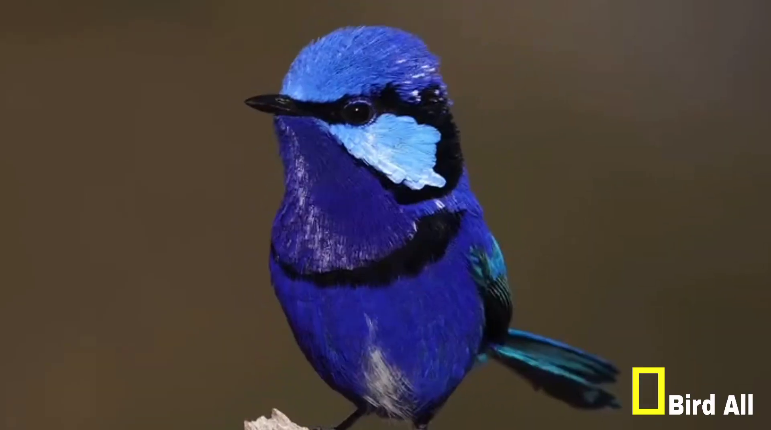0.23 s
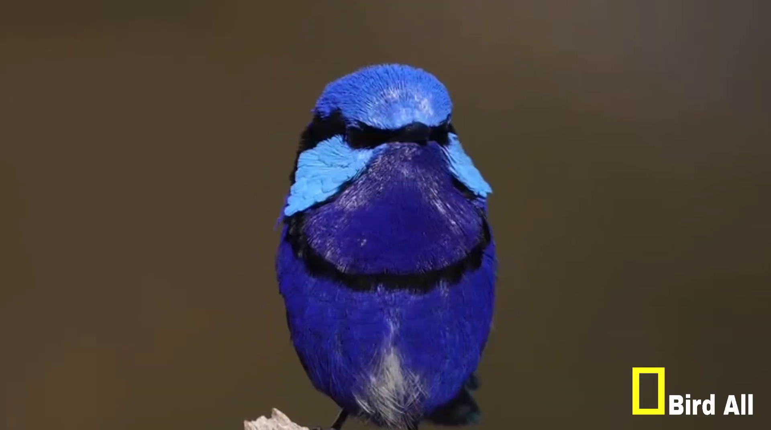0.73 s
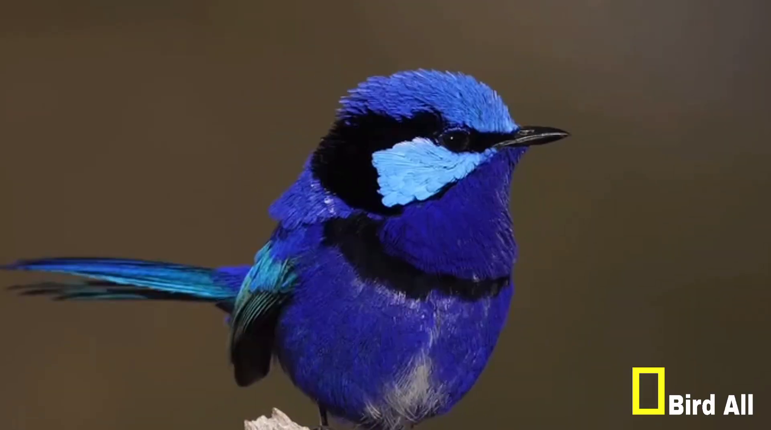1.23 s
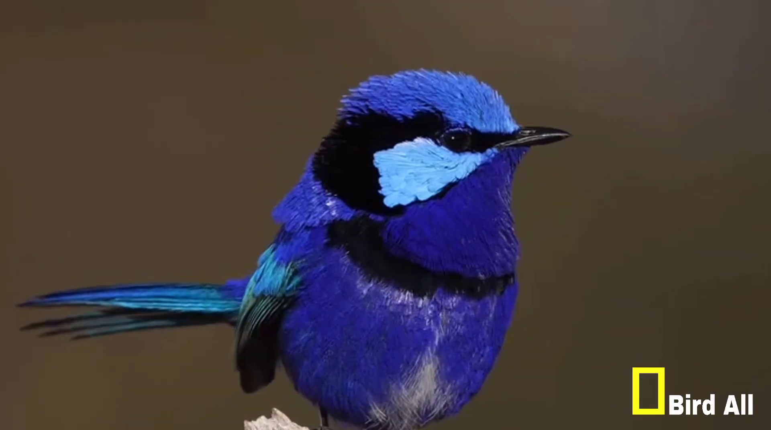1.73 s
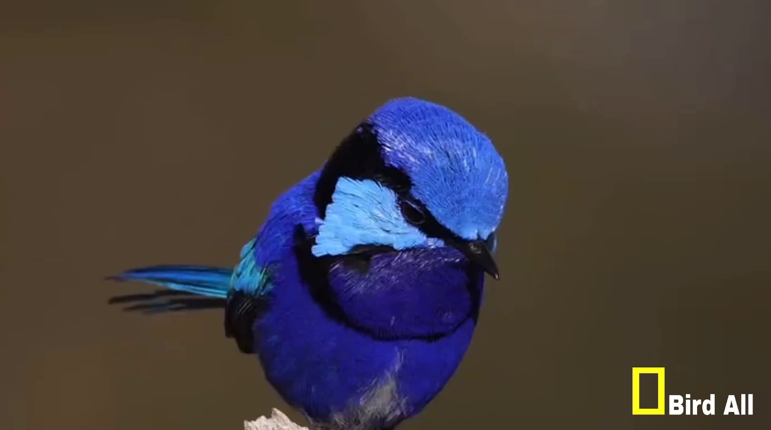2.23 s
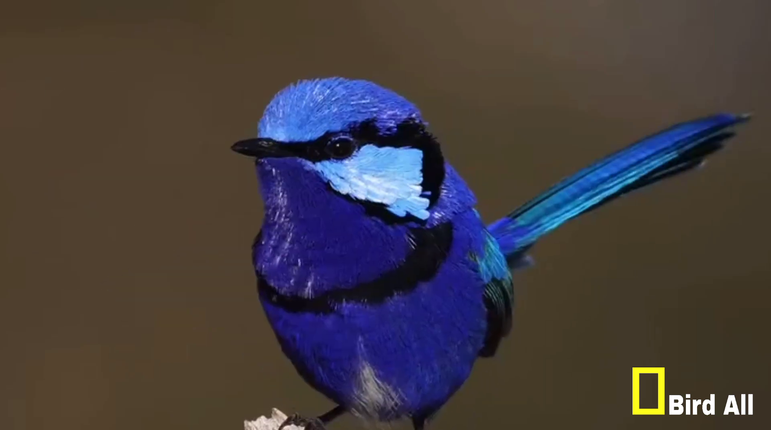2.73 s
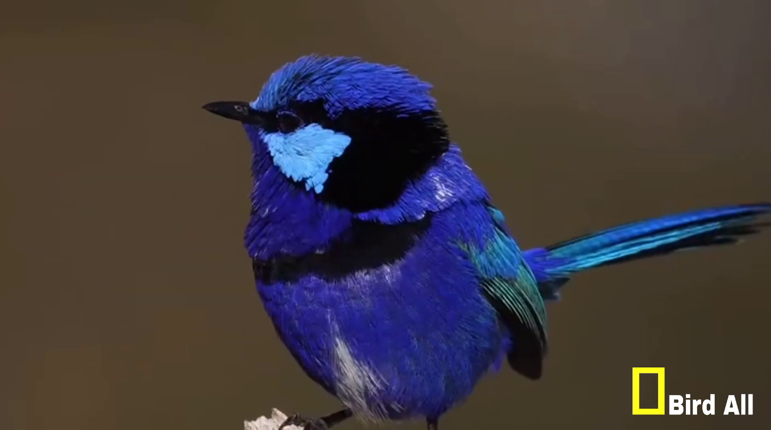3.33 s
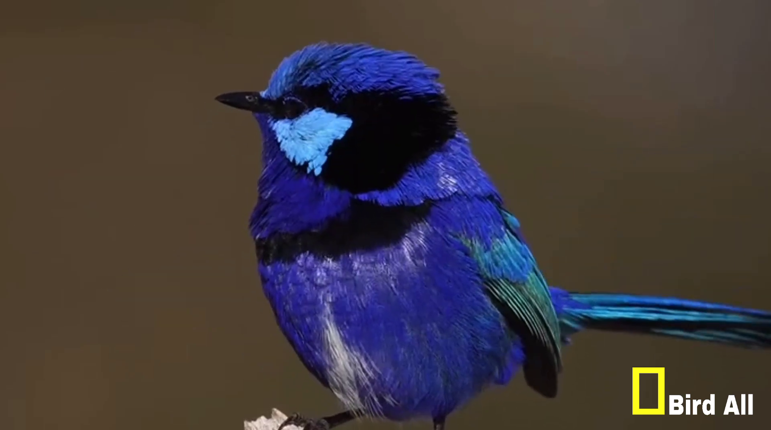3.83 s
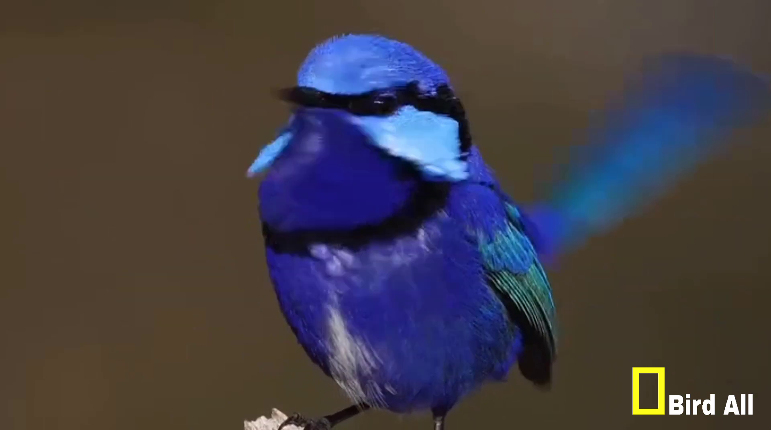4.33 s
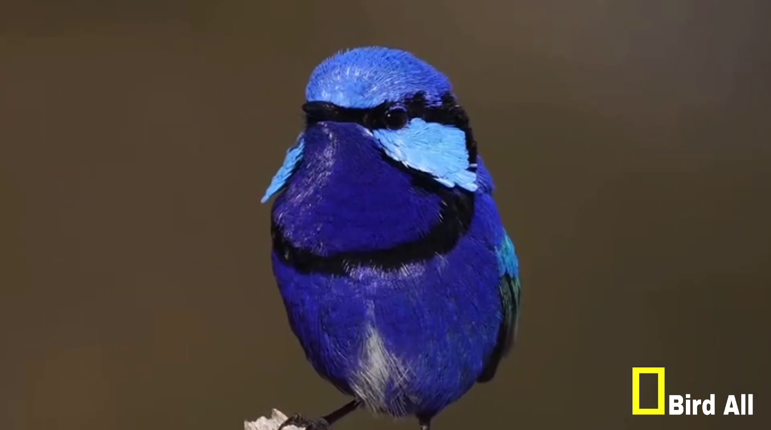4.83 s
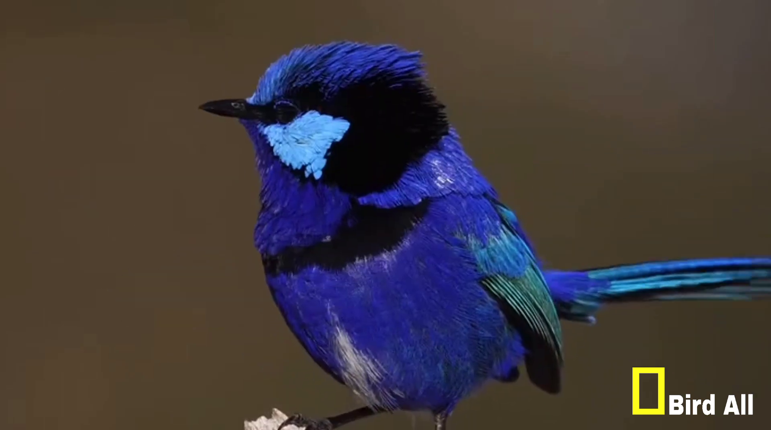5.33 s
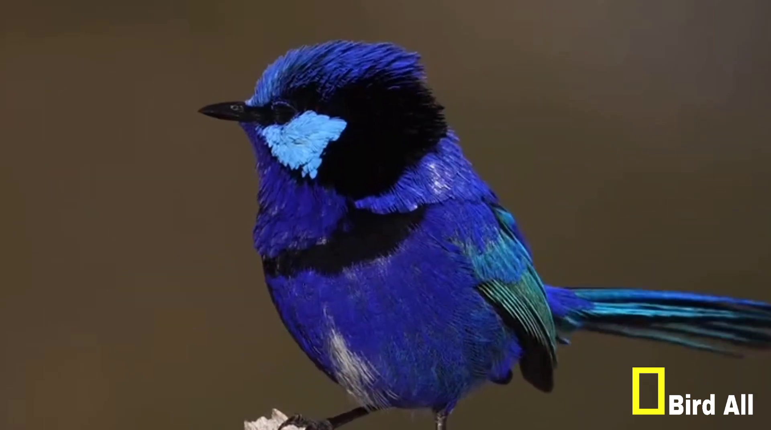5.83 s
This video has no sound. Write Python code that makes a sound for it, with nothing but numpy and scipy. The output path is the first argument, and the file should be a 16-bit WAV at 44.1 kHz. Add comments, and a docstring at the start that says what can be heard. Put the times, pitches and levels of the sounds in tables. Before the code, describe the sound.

In an echoing wood with a quiet, smooth leaf hiss, a small bird starts with a clear high whistle gliding down from 0.1 to 0.4 seconds, then slurs and a rapid, slightly rough warble of upward strokes until 1.3, broken by a steep plunge near 1.05. From 1.5 to 2.1 another bird to the right gives five quick, evenly spaced falling chirps. Thin held whistles drop away at 2.3 and 2.5 among low rising notes from a blurred neighbour. From 2.8 to 3.35 short rising flicks patter over low dips and ticks. A bright climb comes at 3.4, with faint distant buzzes around 3.3 and 3.8. Five sharper hooked falls repeat evenly from 4.0 to 4.8. Sparse slurs and high held whistles close the passage from 5.0 to 6.0. Fainter calls sit left; long diffuse echoes trail every note, and a faint sizzle swells near 2.6.

```python
"""In a wood, small songbirds answer each other: one ahead, leaning right, one farther right, others close by it.
Gliding sines make their whistles, slurs and runs of a repeated note; more whistle and buzz farther off, to the left.
The trees, as decaying noise, throw every note back in a long smear. Far leaves are a smooth, bass-light hiss,
with a faint narrow sizzle above. The direct song has opposite polarity left and right, as from a two-way microphone.
"""
import sys
import numpy as np
from scipy import signal
from scipy.fft import rfft, irfft, next_fast_len
from scipy.io import wavfile
from scipy.ndimage import uniform_filter1d, map_coordinates

SR = 44100
rng = np.random.default_rng(int(sys.argv[2]) if len(sys.argv) > 2 else 0)


def wav_out(sig):
    """Save sig, one row per channel (or a flat mono array), as 16-bit PCM at SR to the path in sys.argv[1]."""
    wavfile.write(sys.argv[1], SR, np.round(np.clip(np.atleast_2d(sig).T, -1, 1) * 32767).astype(np.int16))


N = 267863

# Note levels are those of the voice at the beak, before each bird's direct and echo gains.
# Slurs, one glide a row: start t/s, length t/s, first f/Hz, last f/Hz, bend (over 1 holds then moves,
# under 1 moves then holds), end level/dB, start over end level/dB
AHEAD_SLURS = [ (-0.12, 0.12, 4765, 4623, 0.99, -28.5, -10), (0.39, 0.066, 4707, 4525, 0.5, -31, 4),
               (0.49, 0.071, 4620, 4559, 1.36, -20.5, -11), (2.703, 0.069, 4720, 4490, 0.35, -37.5, -1.5),
               (3.635, 0.015, 6930, 7720, 0.41, -48, 8), (4.135, 0.0087, 6140, 6000, 1.1, -51, 1),
               (4.31, 0.017, 6080, 6200, 2.3, -49, -8.5), (4.485, 0.013, 5620, 5900, 1.2, -47, -3),
               (4.66, 0.014, 5540, 5740, 1.24, -49.5, -4.5), (5.085, 0.021, 5570, 5700, 0.63, -54, 8.5),
               (5.758, 0.047, 6540, 4910, 0.27, -52, -4), ]
# Slurs of the bird on the right: the same columns
RIGHT_SLURS = [ (0.72, 0.11, 7480, 6900, 0.9, -43, -14), (1.03, 0.043, 7780, 5550, 0.82, -42, -3.5),
               (1.43, 0.024, 4975, 3580, 1.37, -43, -3), (3.565, 0.035, 5220, 3570, 1, -43.5, 2.5),
               (3.715, 0.082, 5905, 6253, 0.27, -32.5, -7.5), (3.945, 0.027, 8380, 7320, 1.1, -45.5, -2.5),
               (5.19, 0.065, 4470, 3870, 0.47, -46.5, 3.5), (5.274, 0.021, 5100, 3620, 1, -39.5, -10.5), ]
# Faint slurs from deeper in the wood: the same columns
DISTANT_SLURS = [ (-0.1, 0.19, 6300, 6700, 0.77, -74.5, 7), (-0.04, 0.059, 2605, 2635, 1.2, -58.5, 6),
                 (-0.02, 0.066, 1478, 1400, 0.91, -71, 9.5), (0.01, 0.067, 2150, 2310, 0.65, -67, 0),
                 (0.1, 0.37, 2788, 2490, 0.71, -59.5, -2), (0.775, 0.034, 3224, 3567, 0.46, -46, -2),
                 (0.84, 0.023, 3340, 4320, 1.2, -42, -14.5), (0.92, 0.018, 3630, 3585, 0.8, -45, 1),
                 (0.955, 0.017, 3660, 3540, 1.7, -44.5, -0.5), (2.35, 0.039, 5270, 5660, 1.6, -49, -1.5),
                 (2.05, 0.04, 4310, 4345, 1.6, -54, 5.5), (3.175, 0.047, 4590, 4690, 3.4, -51, -5),
                 (3.482, 0.03, 5580, 5550, 0.97, -48, 3.5), (3.63, 0.047, 3120, 3110, 0.96, -51.5, -3),
                 (4.05, 0.03, 4500, 3714, .7, -44, 0), (4.135, 0.087, 3350, 3770, 1.35, -58.5, -2.5),
                 (2.225, .02, 5080, 5100, 1.1, -53, -3.5), (4.885, 0.087, 2720, 2685, 1.27, -63, -3),
                 (5.14, 0.056, 3630, 3520, 1.8, -63.5, 4), (5.43, 0.006, 5370, 4630, 0.91, -53.5, 2.5),
                 (5.44, 0.047, 4300, 3740, 0.39, -62, -5), (5.48, 0.015, 4700, 4520, 0.72, -57, -1), ]
# Buzzy slurs from deeper in the wood: the same columns, then widest pitch swing f/Hz
BUZZ_SLURS = [(3.344, 0.073, 3120, 3050, 1.3, -52, 5.5, 310), (3.8, 0.058, 4800, 4950, 1.5, -48, -7, 290),
              (3, .04, 2200, 2350, 0.85, -60, -0.5, 150), (3.84, .035, 2600, 2350, 0.91, -68, -1, 150),
              (3.81, 0.085, 2850, 3600, 1.4, -51, -3.5, 390), (3.885, 0.16, 4030, 3820, 1.23, -62, 12, 539)]
# Held notes that drop away: start t/s, length t/s, held f/Hz, last f/Hz, bend, end level/dB,
# start over end level/dB
HELD_NOTES = [(2.316, 0.14, 7140, 5894, 4.1, -37.5, 5), (2.515, 0.13, 7417, 6070, 3.1, -36, -4.5),
              (5.032, 0.099, 7790, 7200, 6.8, -42.5, 0), (5.495, 0.13, 7670, 6600, 2.54, -50, 3),
              (5.733, 0.087, 7790, 6360, 3.9, -40.5, -9.5), (5.894, 0.13, 7720, 6600, 3.2, -45, -6)]

# Long notes with a shape of their own, a fall and a plunge ahead: t/s, f/Hz, level/dB
LONG_FALL_SHAPE = [(0.105, 8560, -45), (0.125, 8500, -31.5), (0.15, 8480, -34), (0.2, 8370, -29.5),
                   (0.24, 8087, -30), (0.28, 7810, -27.5), (0.315, 7630, -32), (0.34, 7596, -31),
                   (0.365, 7400, -42)]
PLUNGE_SHAPE = [(1.045, 4400, -38), (1.054, 4370, -22.5), (1.07, 4330, -22), (1.086, 4260, -28),
                (1.098, 3900, -25.5), (1.11, 3770, -26.5), (1.12, 3530, -33), (1.128, 3050, -44.5)]
# The warble ahead, a list a note; most stroke upward, others arch or fall: t/s, f/Hz, level/dB
WARBLE_NOTES = [
    [(0.6, 4566, -27.5), (0.632, 4706, -23.5), (0.643, 4910, -25.5), (0.65, 5150, -30.5)],
    [(0.702, 4680, -27.5), (0.72, 4470, -26), (0.732, 4600, -24), (0.74, 5000, -23.5), (0.746, 5580, -25.5)],
    [(0.795, 4620, -31.5), (0.815, 4520, -25.5), (0.83, 4620, -22.5), (0.838, 5140, -24.5),
     (0.85, 5290, -29)],
    [(0.885, 5100, -39.5), (0.905, 5605, -36.5), (0.918, 6050, -34.5), (0.935, 6150, -32.5),
     (0.965, 6120, -36), (0.985, 5860, -34), (1.0, 5510, -37.5)],
    [(1.178, 4500, -33.5), (1.195, 4800, -28.5), (1.204, 5150, -27), (1.213, 6000, -32.5)],
    [(1.228, 5050, -37.5), (1.256, 4620, -36.5), (1.263, 4090, -44.5), (1.272, 3853, -36),
     (1.29, 3730, -46.5)],
]
# A climb, a wave and a short arch on the right: t/s, f/Hz, level/dB
CLIMB_SHAPE = [(3.372, 5980, -46.5), (3.385, 6590, -30), (3.41, 7016, -29.5), (3.45, 7250, -40.5),
               (3.49, 7440, -42), (3.515, 7450, -48)]
WAVE_SHAPE = [(5.347, 6530, -47.5), (5.357, 6760, -35), (5.373, 5720, -38), (5.39, 5480, -39.5),
              (5.422, 5970, -39), (5.453, 5904, -52.5)]
HOOK_SHAPE = [(1.366, 6700, -56), (1.375, 7240, -52), (1.4, 6480, -47.5)]
# A far fall that lands and holds: t/s, f/Hz, level/dB
DROP_SHAPE = [(3.508, 4700, -52.5), (3.522, 4000, -39.5), (3.535, 3450, -41), (3.555, 3084, -43),
              (3.578, 3060, -50)]

# A quick falling note, by keyword: length t/s, first and last f/Hz, bend, entry level/dB over the end,
# easing (over 1 slows the glide before its end), mid-note swell level/dB
QUICK_FALL_NOTE = dict(length=.075, first_hz=7930, last_hz=3705, bend=1.6, entry_db=-6, easing=1.7, swell_db=7.5)
# Its run: start t/s, level/dB
QUICK_FALL_RUN = [(1.513, -48), (1.648, -47), (1.781, -45.5), (1.913, -46.5), (2.047, -45.5)]
# A fall that first hooks up to its top: t/s after the start, f/Hz, level/dB over the run's
HOOKED_FALL_SHAPE = [(-0.01, 7800, -20.5), (0.012, 8230, -5.5), (0.035, 7500, -6.5), (0.047, 6850, 1),
                     (0.058, 5720, 4.5), (0.07, 4830, -2.5), (0.082, 4287, 4), (0.088, 4120, -2.5)]
# Its run: start t/s, level/dB
HOOKED_FALL_RUN = [(4.021, -41), (4.198, -41.5), (4.373, -42), (4.546, -43), (4.722, -43)]
# A short rising flick, by keyword: length t/s, first and last f/Hz, bend, entry and swell level/dB
FLICK_NOTE = dict(length=.038, first_hz=3640, last_hz=4060, bend=1.4, entry_db=-11, swell_db=1)
# Its run: start t/s, level/dB
FLICK_RUN = [(2.836, -36), (2.931, -35), (3.024, -33), (3.115, -35), (3.207, -33.5), (3.295, -34.5)]
# A low dipping note, by keyword: length t/s, first and last f/Hz, bend, entry level/dB, easing
LOW_DIP_NOTE = dict(length=0.032, first_hz=2820, last_hz=2668, bend=1, entry_db=3.5, easing=2.35)
# Its run: start t/s, level/dB
LOW_DIP_RUN = [(2.204, -53.5), (2.919, -50), (2.978, -52), (3.044, -50), (3.107, -49), (3.171, -45.5),
               (3.239, -54), (3.322, -53.5)]
# A faint fall, then a low hold that swings upward: t/s after the start, f/Hz, level/dB over the run's
PICKUP_SHAPE = [(-.036, 5700, -13.5), (-.026, 5160, -9.5), (-.016, 4700, -15)]
RISE_SHAPE = [(0, 3037, -8), (.02, 3082, -1.5), (.032, 3387, -2.5), (.046, 3873, 5), (.054, 4350, -4.5),
              (.062, 5070, -4)]
# Their run: start t/s, level/dB
RISE_RUN = [(2.192, -44.5), (2.392, -42.5), (2.586, -40), (2.787, -39.5)]
# Short falling ticks: start t/s, first f/Hz, level/dB
TICK_NOTES = [(2.892, 5110, -55), (3.058, 5300, -58), (3.15, 5200, -57), (3.291, 4900, -56.5),
              (3.358, 5090, -56.5)]

# Faint partials beside the whistle: multiple of the pitch, level/dB
AHEAD_PARTIALS = [(1.5, -43), (2, -46), (3, -42)]
RIGHT_PARTIALS = [(1.5, -46)]
# The late smear from the depth of the wood: f/Hz, decay by 60 dB t/s
WOOD_DECAY = [(2500, 3), (4500, 2.13), (8000, 2.36)]
# Spectrum of the leaf hiss, relative: f/Hz, level/dB per Hz
LEAF_SPECTRUM = [(200, -35), (400, -23), (600, -15), (800, -5), (1000, -1), (1500, 0), (2200, 0),
                 (5000, .5), (9000, -2), (11500, -3), (13000, -5), (14300, -7.5), (15300, -11)]
# Left-right likeness of the hiss: f/Hz, correlation from -1 to 1
LEAF_LIKENESS = [(250, -.3), (600, .3), (1200, .15), (2500, -.1), (8000, -.3), (14000, -.4)]
# Swell of the high sizzle: t/s, level/dB
SIZZLE_SWELL = [(0, -88), (2.2, -79.5), (2.4, -69.5), (2.65, -61.5), (2.9, -82.5), (3.5, -79.5),
                (3.998, -77), (4.5, -84), (6.1, -76.5)]

FADE = 0.005  # half the swell at each end of a note (s)
LEAD = SR // 4  # room for notes that begin before zero (samples)
ENTRY_SETTLES = 0.87  # how soon the level leaves its start (1 = evenly)
LEAD_IN_HZ, LEAD_IN_S, LEAD_IN_DB = 700, 0.0048, -8  # a held note enters softly from above,
DIP_HZ, DIP_S = 458, 0.0194  # overshoots below the held pitch and climbs back
TICK_S, TICK_FALL_HZ = 0.012, 296
BUZZ_RATE_HZ, BUZZ_SWELL_DB = 90, 7  # a buzz swells and shakes most widely in its middle
BUZZ_NARROW = 0.51  # its swing at both ends over the widest
RASP_RATE, FLUTTER_RATE = 220, 62.5  # random curves of pitch and level (knots a second)
CLUMP_DB, CLUMP_RATE = 2.5, 45  # uneven echo path: depth, knots a second of delay
TWIG_T60 = 0.055  # twigs round the perch smear the direct sound (s)
STIR_DB, STIR_RATE = 1.13, 45  # moving leaves make the echoes swell and sink: depth, knots a second
SIZZLE_HZ, SIZZLE_WIDE_HZ = 10800, 1100
TOP_HZ = 15500


def singer_ahead():
    """Clear whistles, then a plunge and a rougher warble whose notes are more blurred by twigs."""
    place = dict(pan_db=-10.0, echo_pan_db=-0.1, direct_db=-1.5,
                 near_db=2.5, far_db=-7.0, near_t60=0.42, alike=0.35)
    clear = bird(slurs(AHEAD_SLURS) + [LONG_FALL_SHAPE], AHEAD_PARTIALS,
                 flutter_db=1.5, rasp=0.0023, blur=0.16, **place)
    plunge = bird([PLUNGE_SHAPE], AHEAD_PARTIALS, flutter_db=2.0, rasp=0.004, blur=0.25, **place)
    warble = bird(WARBLE_NOTES, AHEAD_PARTIALS, flutter_db=4.0, rasp=0.011, blur=0.75, **place)
    return clear + plunge + warble


def singer_right():
    """Slurs, shaped and held notes and runs of falls, voiced as nearly pure sines."""
    shaped = [CLIMB_SHAPE, WAVE_SHAPE, HOOK_SHAPE]
    holds = [held(*row) for row in HELD_NOTES]
    quick = run_of(QUICK_FALL_NOTE, QUICK_FALL_RUN)
    hooked = [np.add(HOOKED_FALL_SHAPE, [s, 0, db]) for s, db in HOOKED_FALL_RUN]
    return bird(slurs(RIGHT_SLURS) + shaped + holds + quick + hooked, RIGHT_PARTIALS,
                flutter_db=3.0, rasp=0.0015, blur=0.08,
                pan_db=-17.0, echo_pan_db=0.0, direct_db=-2.0,
                near_db=1.5, far_db=-7.0, near_t60=0.3, alike=0.28)


def neighbour():
    """A bird among twigs: rises with a faint pickup, and ticks, much smeared by short extra paths."""
    rises = [np.add(part, [s, 0, db]) for s, db in RISE_RUN for part in (PICKUP_SHAPE, RISE_SHAPE)]
    ticks = [glide(s, TICK_S, hz, hz - TICK_FALL_HZ, 1.0, db, 0) for s, hz, db in TICK_NOTES]
    return bird(rises + ticks, [], flutter_db=2.9, rasp=0.013, blur=0.8,
                pan_db=-6.5, echo_pan_db=-0.5, direct_db=-3.0,
                near_db=1.5, far_db=-1, near_t60=0.34, alike=0.041)


def flicks_and_dips():
    """Flicks and low dips, overlapping at different paces, with weaker near echoes."""
    return bird(run_of(FLICK_NOTE, FLICK_RUN) + run_of(LOW_DIP_NOTE, LOW_DIP_RUN), [],
                flutter_db=1.5, rasp=0.0027, blur=0.2,
                pan_db=-13, echo_pan_db=-1.5, direct_db=-1.0,
                near_db=0.0, far_db=-3.0, near_t60=0.32, alike=0.11)


def distant_birds():
    """Faint slurs, a drop and buzzes from deeper in the wood, with most of the direct sound smeared."""
    buzzes = [buzz(*row) for row in BUZZ_SLURS]
    return bird(slurs(DISTANT_SLURS) + [DROP_SHAPE] + buzzes, [],
                flutter_db=4.0, rasp=0.012, blur=0.85,
                pan_db=13.0, echo_pan_db=-1.7, direct_db=-2.5,
                near_db=2.9, far_db=-3.5, near_t60=0.36, alike=0.044)


def bird(notes, tones, flutter_db, rasp, blur, pan_db, echo_pan_db, direct_db, near_db, far_db, near_t60, alike):
    """Each note arrives directly, in opposite polarity left and right, then as restless echoes."""
    # positive pan is louder on the left
    direct_gain = amp(direct_db) * np.array([[amp(pan_db / 2)], [-amp(-pan_db / 2)]])
    echo_gain = amp([[echo_pan_db / 2], [-echo_pan_db / 2]])
    out = np.zeros((2, LEAD + N + 2 * SR))
    for note in notes:
        note = np.array(note)
        voice = whistle(note, tones, flutter_db, rasp)
        path = echoes(note[:, 1].mean(), near_db, far_db, near_t60, alike) * echo_gain
        sound = signal.fftconvolve(voice[None], path, axes=1)
        # the echo energy follows the path's gain, however the note's pitch meets the noise
        echo_norm = np.linalg.norm(voice) * np.linalg.norm(path, axis=1)[:, None]
        sound = sound * echo_norm / np.linalg.norm(sound, axis=1)[:, None]
        stir = amp(STIR_DB * wobble(sound.shape[1], STIR_RATE))
        sound = sound * stir / np.sqrt(np.mean(stir ** 2))
        direct = through_twigs(voice, blur)
        sound[:, :len(direct)] += direct_gain * direct
        start = LEAD + round((note[0, 0] - FADE) * SR)
        out[:, start:start + sound.shape[1]] += sound
    return out[:, LEAD:LEAD + N]


def whistle(note, tones, flutter_db, rasp):
    """A gliding sine with soft ends and faint partials; a fourth column shakes the pitch into a buzz."""
    s, hz, db = note.T[:3]
    t = np.arange(s[0] - FADE, s[-1] + FADE, 1 / SR)
    pitch = uniform_filter1d(np.interp(t, s, hz), size=200, mode="nearest")  # round the corners
    # the voice is never quite steady
    pitch = pitch * (1 + 0.003776 * wobble(len(t), 50) + rasp * wobble(len(t), RASP_RATE))
    if note.shape[1] > 3:
        shake = np.sin(2 * np.pi * (BUZZ_RATE_HZ * t + 0.308 * wobble(len(t), 40)))
        pitch = pitch + np.interp(t, s, note[:, 3]) * shake
    phase = 2 * np.pi * np.cumsum(pitch) / SR
    from_end = np.minimum(t - t[0], t[-1] - t)
    ends = np.sin(np.pi / 2 * np.clip(from_end / (2 * FADE), 0, 1)) ** 2
    wave = np.sin(phase) + sum(amp(level) * np.sin(k * phase) for k, level in tones)
    # moving leaves and eddies on the path make the level flutter
    level_db = np.interp(t, s, db) + flutter_db * wobble(len(t), FLUTTER_RATE)
    return np.sqrt(2) * amp(level_db) * ends * wave


def glide(s, length, first_hz, last_hz, bend, db, entry_db, easing=1, swell_db=0):
    """The points (t/s, f/Hz, level/dB) of one slur, bending from its first pitch to its last."""
    u = np.linspace(0, 1, num=24)
    done = 1 - (1 - u ** bend) ** easing
    level_db = db + entry_db * (1 - u) ** ENTRY_SETTLES + swell_db * np.sin(np.pi * u)
    return np.transpose([s + length * u, first_hz + (last_hz - first_hz) * done, level_db])


def slurs(rows):
    """One glide a row."""
    return [glide(*row) for row in rows]


def run_of(shape, starts):
    """The same note again and again, each at its own level."""
    return [glide(s, db=db, **shape) for s, db in starts]


def held(s, length, held_hz, last_hz, bend, db, entry_db):
    """Lead-in from above, dip, hold, drop: two dying offsets bend the start of a glide."""
    note = glide(s, length, held_hz, last_hz, bend, db, entry_db)
    since = note[:, 0] - s
    lead, dip = np.exp(-since / LEAD_IN_S), np.exp(-since / DIP_S)
    return note + np.transpose([0 * lead, LEAD_IN_HZ * lead - DIP_HZ * dip, LEAD_IN_DB * lead])


def buzz(*row):
    """A slur whose pitch shakes, most widely in mid-note."""
    note = glide(*row[:-1], swell_db=BUZZ_SWELL_DB)
    middle = np.sin(np.linspace(0, np.pi, len(note)))
    return np.column_stack([note, row[-1] * (BUZZ_NARROW + (1 - BUZZ_NARROW) * middle)])


def through_twigs(voice, blur):
    """A share of the sound's power, blur, comes by many slightly longer paths."""
    blur = np.clip(blur, 0, 1)
    t = np.arange(SR // 10) / SR
    paths = rng.standard_normal(len(t)) * amp(-60 * t / TWIG_T60)
    paths = np.sqrt(blur) * paths / np.linalg.norm(paths)
    paths[0] = np.sqrt(1 - blur)
    smeared = signal.fftconvolve(voice, paths)
    return smeared * np.linalg.norm(voice) / np.linalg.norm(smeared)


def echoes(hz, near_db, far_db, near_t60, alike):
    """Scatter from near trunks dies fast, the depth of the wood slowly; drawn anew for each note."""
    t = np.arange(round(1.5 * SR)) / SR
    shared, own = rng.standard_normal((2, len(t)))
    alike = np.clip(alike, 0, 1)  # share of the right that mirrors the left, in opposite polarity
    pair = np.array([shared, -alike * shared + np.sqrt(1 - alike ** 2) * own])
    near = amp(-60 * t / near_t60)
    far = amp(-60 * t / along(WOOD_DECAY, hz)) * (1 - np.exp(-t / 0.045))  # builds up late
    near_power = amp(near_db) ** 2 * near ** 2 / np.sum(near ** 2)
    far_power = amp(far_db) ** 2 * far ** 2 / np.sum(far ** 2)
    clumps = amp(CLUMP_DB * wobble(len(t), CLUMP_RATE))  # trunks stand in clumps
    return pair * np.sqrt(near_power + far_power) * clumps


def leaves(level_db=-58):
    """A smooth far hiss: mid and side noise, balanced so left and right match as the likeness says."""
    def mid_side(hz):
        turn = np.arccos(np.clip(along(LEAF_LIKENESS, hz), -1, 1)) / 2
        return amp(along(LEAF_SPECTRUM, hz)) * [np.cos(turn), np.sin(turn)]

    mid, side = filtered(rng.standard_normal((2, N)), mid_side)
    pair = np.array([mid + side, mid - side])
    return amp(level_db) * pair / pair.std()


def sizzle():
    """A narrow band of high hiss that swells for a moment."""
    band = filtered(rng.standard_normal((2, N)),
                    lambda hz: np.exp(-((hz - SIZZLE_HZ) / SIZZLE_WIDE_HZ) ** 2))
    level_db = np.interp(np.arange(N) / SR, *np.transpose(SIZZLE_SWELL))
    return amp(level_db) * band / band.std()


def amp(db):
    """Gain of a level in dB."""
    return 10 ** (np.asarray(db) / 20)


def along(points, hz):
    """Read (f/Hz, value) points at hz, on a log axis."""
    f, v = np.transpose(points)
    return np.interp(np.log(hz + 1), np.log(f + 1), v)


def wobble(count, rate):
    """A smooth random curve of count samples, rate knots a second."""
    knots = int(count * rate / SR) + 4
    fine_at = np.arange(8 * knots) / 8
    fine = map_coordinates(rng.standard_normal(knots), [fine_at])  # cubic curve through the knots
    return np.interp(np.arange(count) * rate / SR, fine_at, fine)


def filtered(x, response):
    """Shape the spectrum of x by a response of frequency."""
    m = next_fast_len(N + 8192)
    return irfft(rfft(x, m) * response(np.fft.rfftfreq(m, 1 / SR)), m)[..., :N]


def scene():
    """The singers over the hiss."""
    near_birds = singer_ahead() + singer_right() + neighbour() + flicks_and_dips()
    return near_birds + distant_birds() + leaves() + sizzle()


def record(dry):
    """The recorder keeps nothing above its band limit."""
    return filtered(dry, lambda hz: hz < TOP_HZ)


dry = scene()
out = record(dry)
wav_out(out)
```